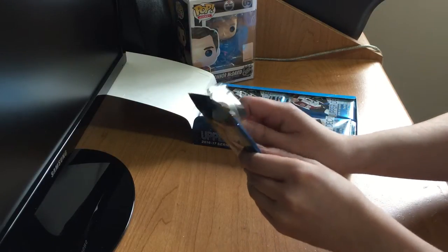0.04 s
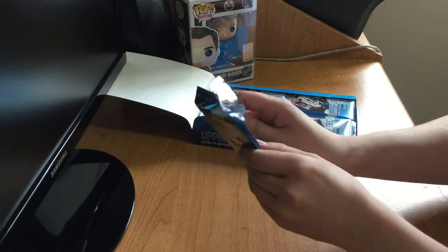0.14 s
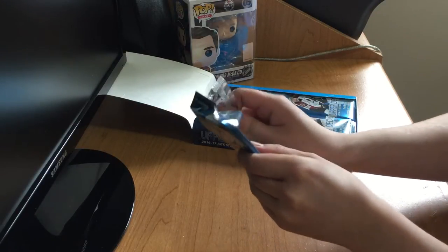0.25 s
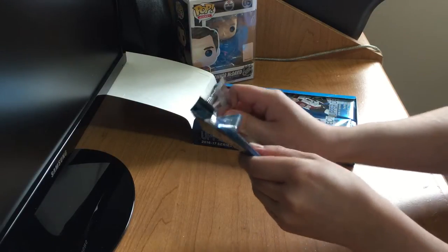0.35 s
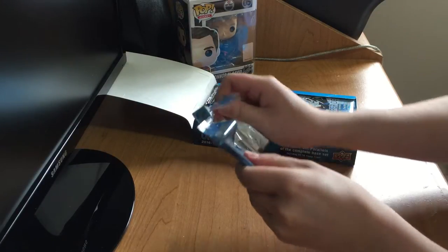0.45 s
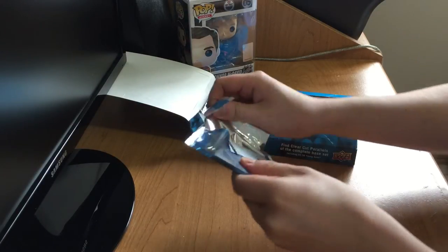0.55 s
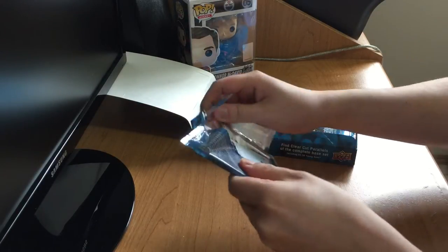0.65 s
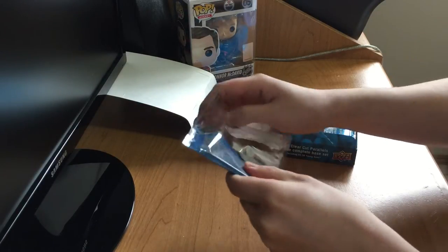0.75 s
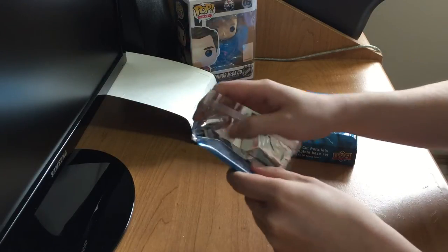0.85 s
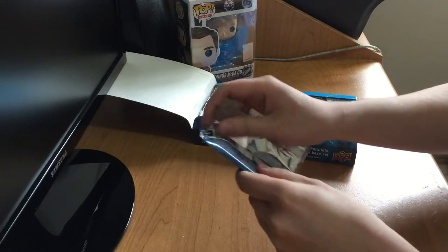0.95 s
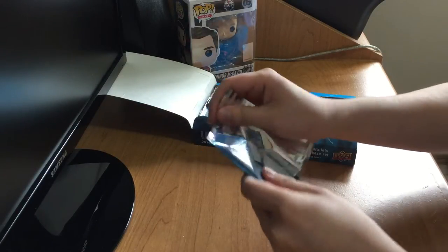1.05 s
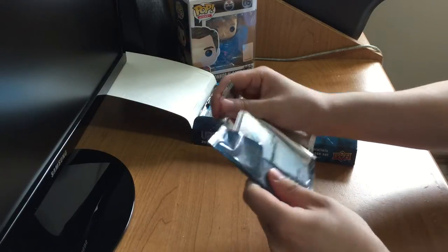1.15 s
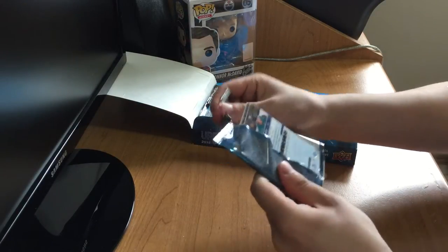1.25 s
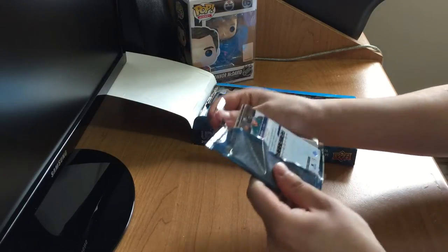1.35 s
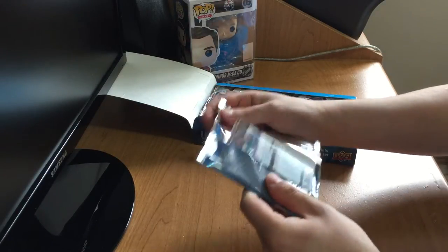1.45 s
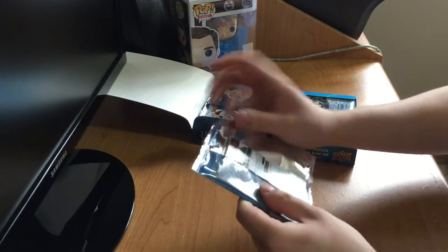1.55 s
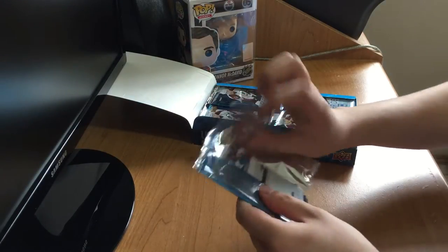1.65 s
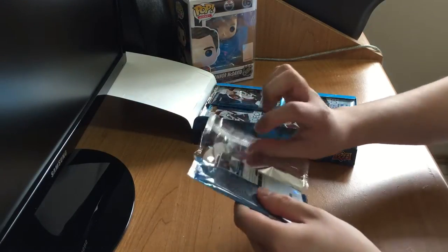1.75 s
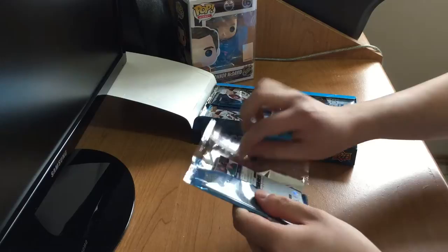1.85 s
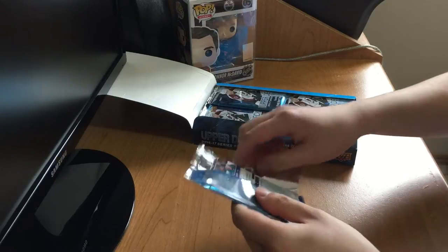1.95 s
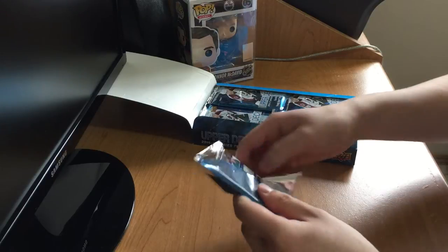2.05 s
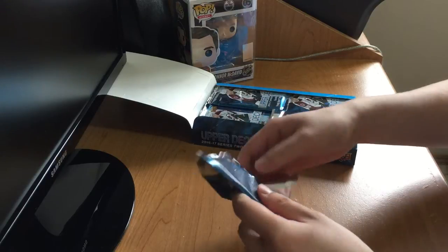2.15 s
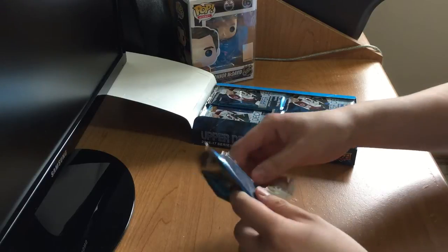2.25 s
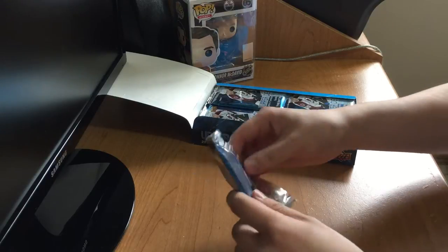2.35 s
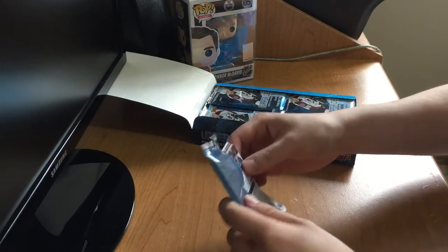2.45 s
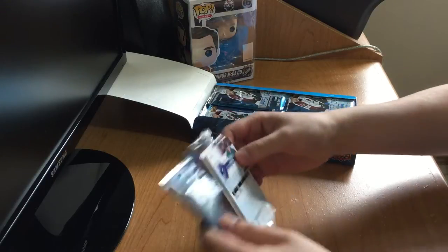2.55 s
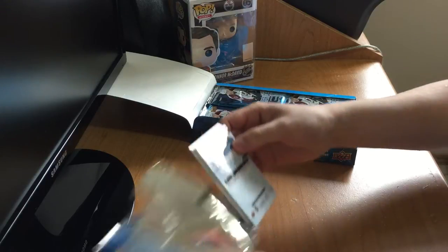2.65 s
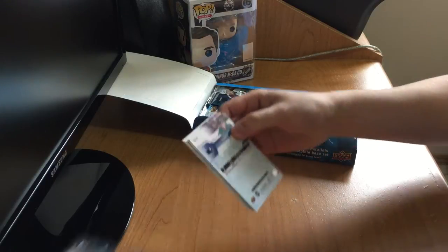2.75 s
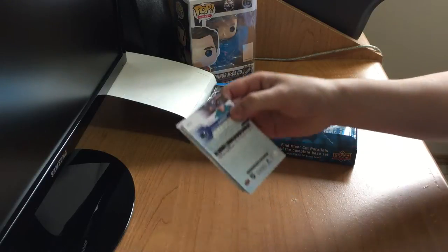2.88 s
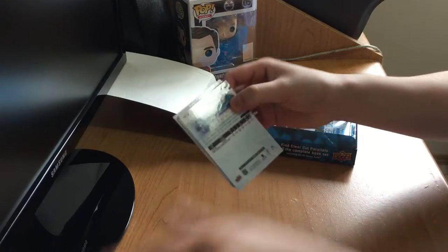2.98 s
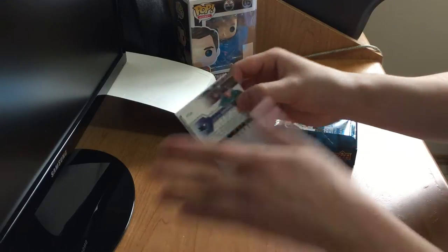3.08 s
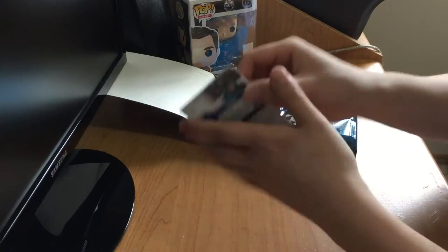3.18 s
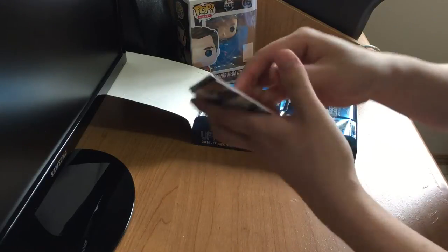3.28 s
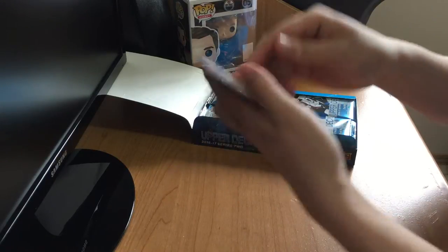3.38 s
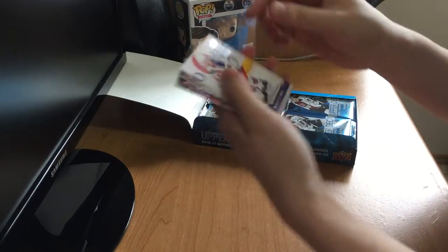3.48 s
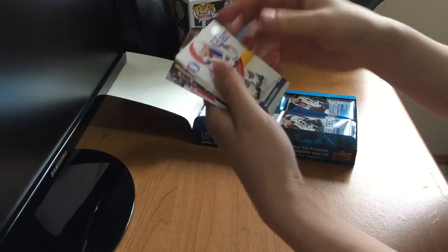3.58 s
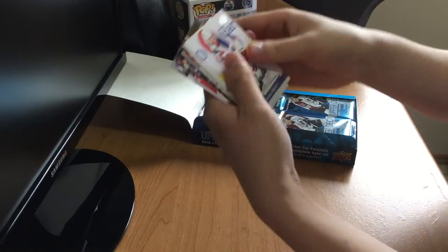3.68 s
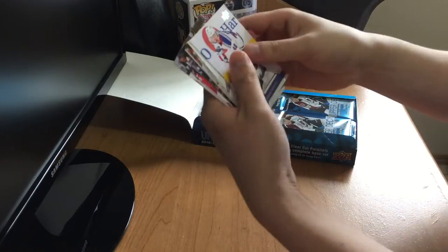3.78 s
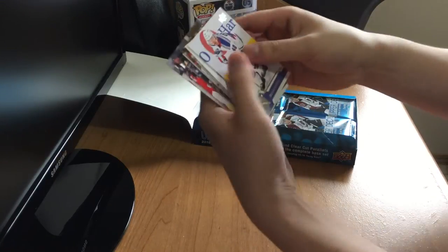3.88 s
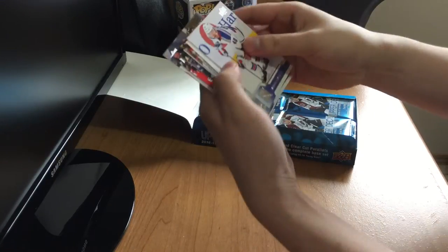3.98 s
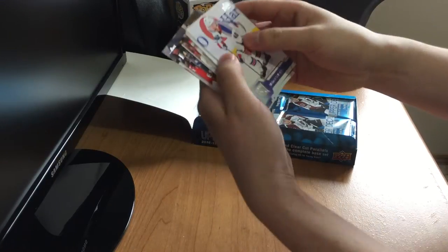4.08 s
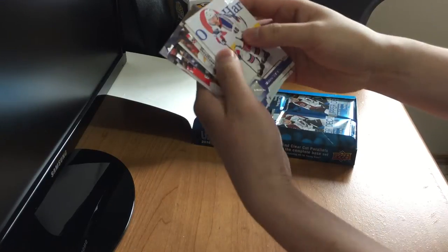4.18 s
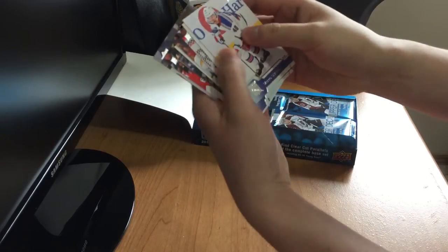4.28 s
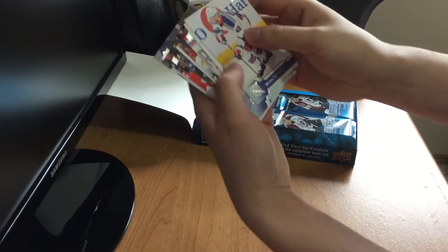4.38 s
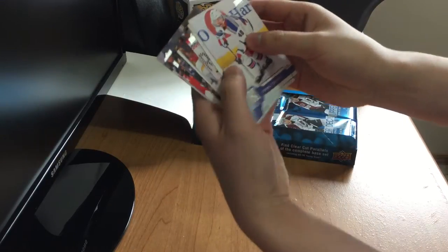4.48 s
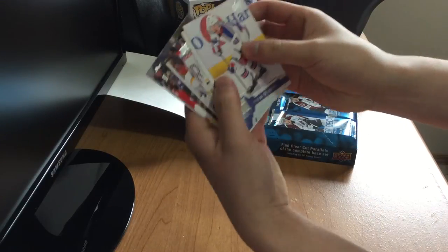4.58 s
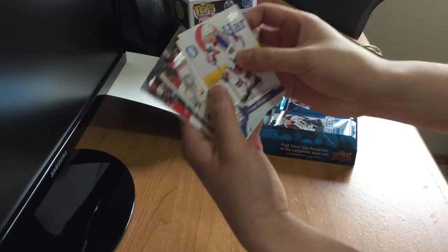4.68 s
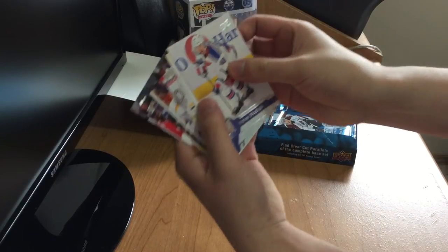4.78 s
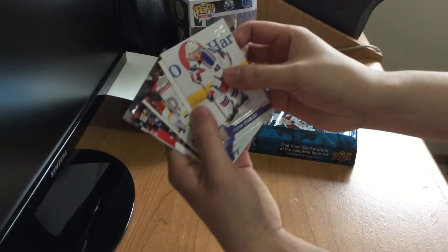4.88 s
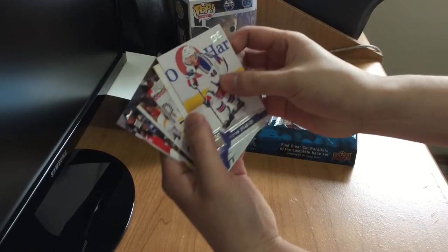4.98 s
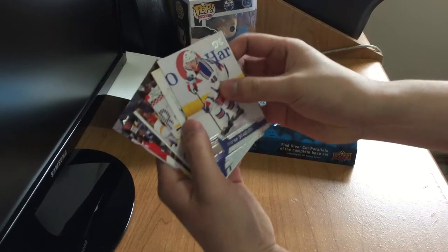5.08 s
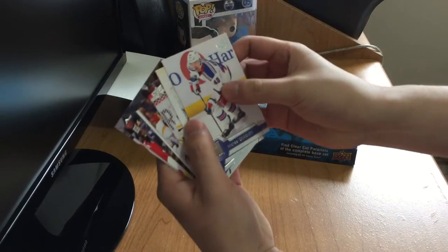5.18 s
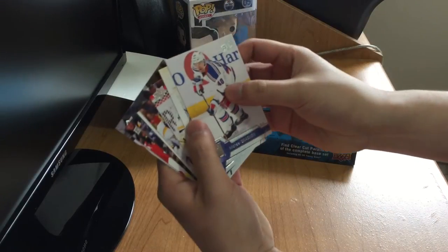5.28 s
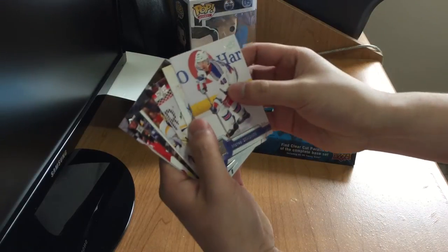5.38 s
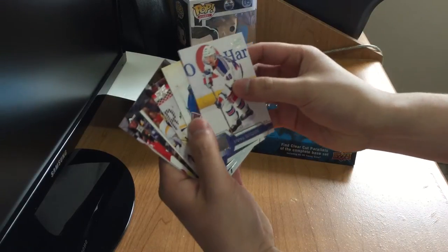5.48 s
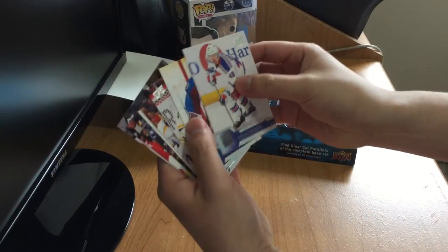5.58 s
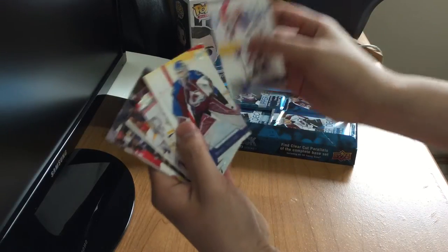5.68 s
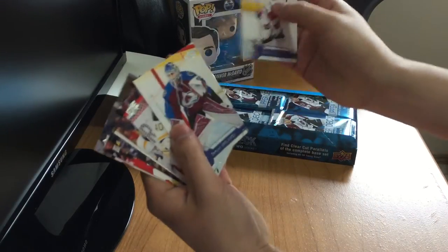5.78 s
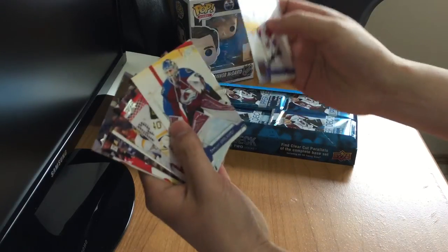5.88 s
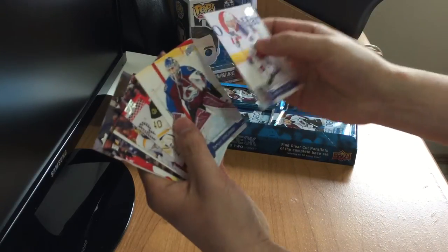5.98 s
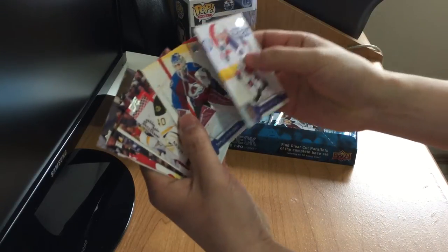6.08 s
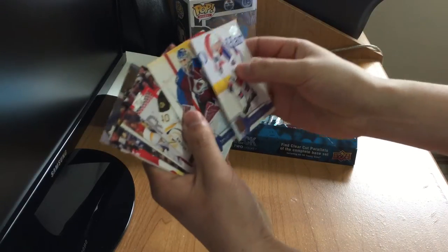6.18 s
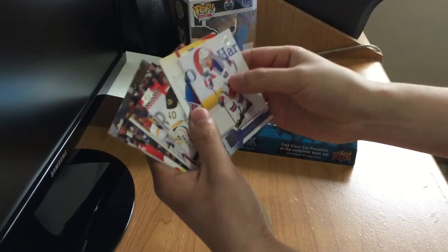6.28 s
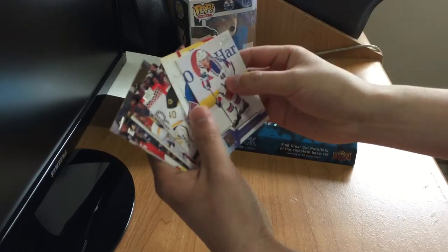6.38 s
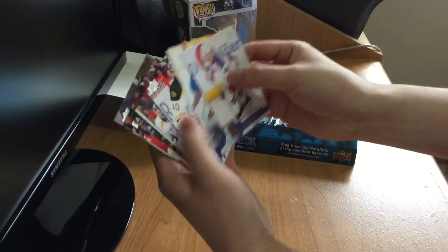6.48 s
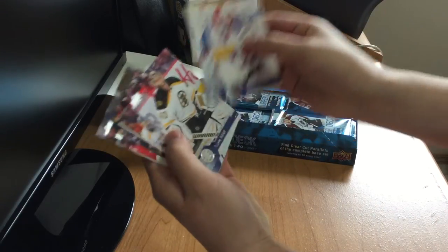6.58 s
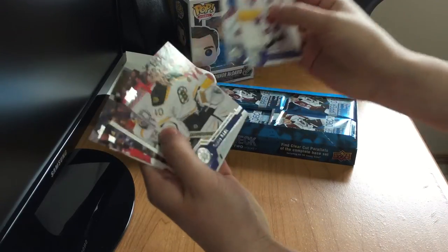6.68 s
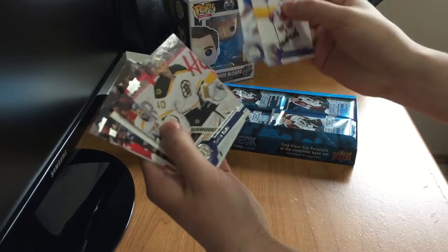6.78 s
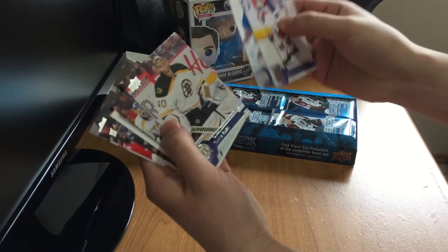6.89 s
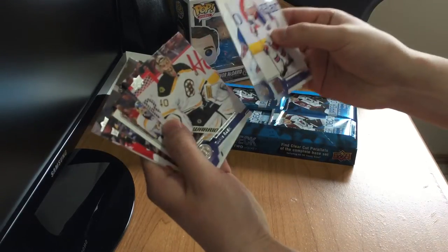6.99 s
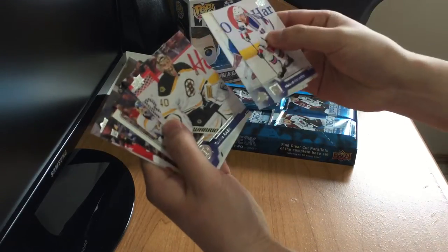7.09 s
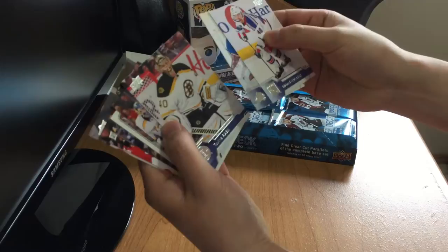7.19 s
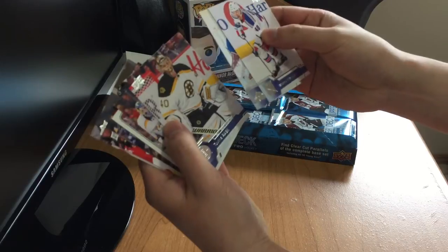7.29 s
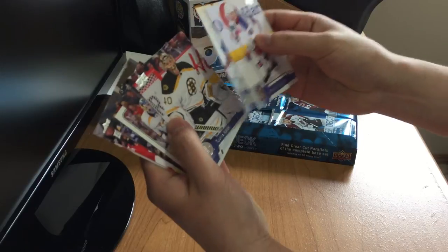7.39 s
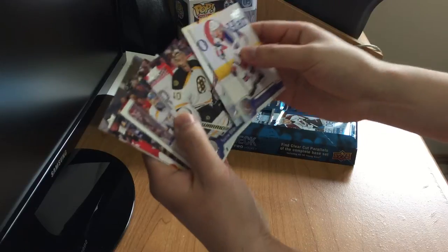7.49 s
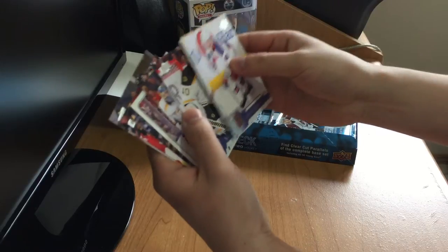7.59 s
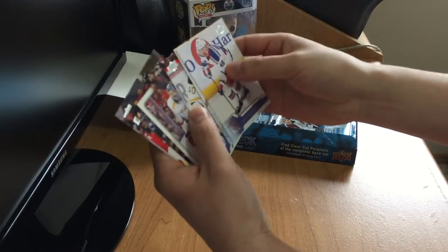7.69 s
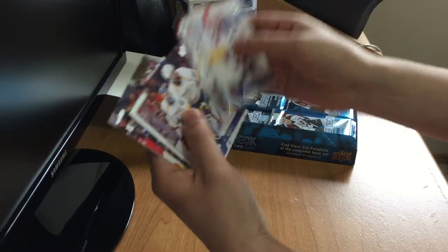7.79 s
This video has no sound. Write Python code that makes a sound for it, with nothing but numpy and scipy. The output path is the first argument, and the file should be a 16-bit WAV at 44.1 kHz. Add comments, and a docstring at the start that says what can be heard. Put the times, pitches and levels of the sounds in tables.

```python
"""Foil card pack torn open by hand at a desk: sharp snaps of buckling creases, each a short burst with a ringing
facet, over a crackle of random ticks; the ripping seam is a dense run of ticks, squeaks are gliding tones.
Then cards are drawn out and leafed through: edges tap as ringing bursts, faces slide as gritty noise,
a thumb drags as stick-slip grains, and hands bump as short low swells.
One microphone close by in a small, quiet room: the room answers with decaying noise, over steady air and faint hum."""
import sys
import numpy as np
from scipy import signal
from scipy.fft import rfft, irfft, next_fast_len
from scipy.io import wavfile
from scipy.ndimage import uniform_filter1d, map_coordinates

SR = 44100
rng = np.random.default_rng(int(sys.argv[2]) if len(sys.argv) > 2 else 0)


def put_to_file(sound):
    """Save the sound as 16-bit audio at rate SR, in the file named by the first command-line argument."""
    columns = np.atleast_2d(sound).T  # one column per channel
    safe = np.clip(columns, -1, 1)
    whole_steps = np.round(safe * 32767)
    wavfile.write(sys.argv[1], SR, whole_steps.astype(np.int16))


N = 345733
TIME = np.arange(N) / SR
TOP_HZ = 16000  # upper band limit

# Individually timed snaps of creases buckling in the foil, loud and faint.
# Each row: start in seconds, level in dB, bass in dB, treble in dB, facet ring in Hz.
CREASE_SNAPS = [(0.0396, -34.5, -4, -14, 10180), (0.0617, -31.5, -4, -14.5, 6250),
                (0.0724, -31.5, -14, -4.5, 7060), (0.1006, -28.5, -12.5, -3.5, 4330),
                (0.138, -25.5, -7, 4, 5530), (0.1417, -26, -14.5, -9.0, 7060), (0.154, -32, -4, -5, 2080),
                (0.2197, -29.5, -4, -1, 2350), (0.2699, -22.5, -22, 1, 4330),
                (0.2728, -14.5, -18.0, -4, 7060), (0.2741, -18.5, -8.5, 0.5, 4890),
                (0.2816, -32.0, -18.5, -4, 4890), (0.3167, -15.5, -15, -0.0, 7060),
                (0.4015, -20, -11.0, 0, 1630), (0.4382, -16.0, -1, 6, 9010), (0.4975, -25, -7, 7.5, 1000),
                (0.5185, -20, -4.5, 0, 1280), (0.5372, -11.5, -13.0, -3.5, 1440),
                (0.5478, -23, 4.5, -2.5, 2080), (0.5541, -17, 3.5, -8, 1630),
                (0.567, -17.5, 10, -6.5, 1440), (0.5814, -16, 0.5, -2.0, 2080), (0.5878, -8, 2, -2, 2350),
                (0.5963, -30, -1.0, -8.5, 1630), (0.6273, -28.5, 3.0, 0.5, 5530),
                (0.6956, -32.5, -4.5, -3.5, 7980), (0.721, -32.5, -2.5, 2.5, 1440),
                (0.7274, -21, 5, -5, 1440), (0.7361, -37.0, -2.5, -13, 1840),
                (0.7516, -33.5, -7.5, -13, 3000), (0.8084, -19.5, -4.5, 0.5, 1000),
                (0.8305, -22, 1, 2.0, 7060), (0.8309, -18.0, -11, -3.5, 1840),
                (0.8408, -34.0, -2.5, -8, 1840), (0.8487, -29.5, -2.5, -14, 13000),
                (0.8937, -19, 0.5, 6, 7060), (0.9038, -25.0, -9, -2, 5530),
                (1.031, -23.5, -11.5, -5.5, 3000), (1.0336, -25.0, -12, -2, 3000),
                (1.0818, -31.5, -19, -1, 6250), (1.1236, -28.5, 5.5, -6.5, 3000),
                (1.145, -35.5, 1.5, -13.5, 3000), (1.1553, -31.5, -4, -17, 3000),
                (1.1693, -24, -13.5, -2, 3000), (1.1963, -39, -3, -11.5, 3000),
                (1.2235, -22.5, 4.0, -14.5, 13000), (1.2265, -19.5, 1.5, -6.5, 7060),
                (1.2301, -23.5, -3.5, -12.0, 9010), (1.243, -23, -9, 1, 4890),
                (1.2617, -14.5, -3, -5, 7980), (1.2747, -29.5, -2, -7.5, 5530),
                (1.2822, -29.0, 7.5, 0.5, 3830), (1.3257, -35, -4.0, -6.5, 1130),
                (1.3586, -21.5, 0, -6.5, 3000), (1.3766, -31.5, 9.5, -1.0, 2080),
                (1.3983, -20, -1, 2.5, 1630), (1.4204, -18, 4.5, -6.0, 2660), (1.5299, -21, 2, -0.5, 5530),
                (1.5425, -24, -7, -15.5, 2660), (1.5538, -36.5, -1.5, -6.5, 7980),
                (1.5716, -22, 1, 6.5, 3000), (1.6192, -26.5, -8, 3, 6250),
                (1.6301, -28.5, -3.5, -3.5, 3000), (1.6621, -30.5, -11, 1.0, 7980),
                (1.6757, -27.5, -3, 3, 7060), (1.6856, -36, 3, -4, 4890), (1.7458, -36, 3, -0.5, 4890),
                (1.755, -27, -8, -5.0, 1000), (1.7725, -37, -4, -25, 7060), (1.7948, -35.5, 6.5, -4, 6250),
                (1.8525, -44.5, 7, 9.5, 5530), (1.9996, -44.5, -3.0, 7, 13000),
                (2.1137, -41, -16, -6, 1000), (2.1284, -27.0, -5.5, 1.5, 1840),
                (2.1364, -35.5, 3.5, -8, 4890), (2.1404, -23, -37, 1.5, 1280),
                (2.1533, -27.0, -14, -3.5, 4890), (2.2793, -46.0, -4.0, 8, 3830),
                (2.292, -29.5, -8, -8.0, 4330), (2.3209, -22.5, -35, -3.5, 2660),
                (2.3927, -32.5, -14, -11, 3390), (2.4329, -33.5, -2.5, -12, 10180),
                (2.64, -32.0, -25, -6.5, 4890), (2.6485, -35.5, -8, -13.5, 3390),
                (2.73, -43, 6.0, -18, 3000), (2.7392, -49, 4, -12, 1000), (2.765, -49, -5, -9.0, 5530),
                (2.8518, -43.5, -13, 3.5, 5530), (2.8577, -46, -6, 7.5, 6250), (2.9332, -36, 1, -6.5, 4890),
                (2.9372, -35.5, -8, -7.0, 1280), (2.9632, -33, -5.5, -3, 1440),
                (2.9745, -45.5, -13, -12, 2350)]
# Squeezes and pulls of the wrapper; the grip is at full strength from the start.
# Each row: start in seconds, length in seconds, crackle in dB before its trim, panel rustle in dB.
WRAPPER_GRIPS = [(0.02, .055, -44, -53.5), (0.151, .19, -43, -60.5), (0.4, .17, -40.5, -53.5),
                 (0.569, .04, -43, -35), (0.638, .15, -50.5, -49), (0.815, .1, -48.5, -52.5),
                 (1.038, 0.049, -49.5, -70), (1.057, 0.00499, -56, -54.5), (1.141, .08, -44, -57),
                 (1.247, .185, -44, -53), (1.532, .11, -46.5, -63), (1.729, 0.036, -44, -63),
                 (1.84, 0.044, -61.5, -78), (2.01, .09, -71, -72.5), (2.14, 0.041, -48, -56),
                 (2.298, .05, -63, -66), (2.389, .06, -47.5, -57.5), (2.533, .1, -63.5, -78.5),
                 (2.648, .03, -48, -57.5), (2.742, .04, -55.5, -80), (2.946, .05, -53.5, -81),
                 (3.055, .055, -57.5, -60)]
# Foil tearing or scraping.
# Each row: start in seconds, length in seconds, level in dB before its trim, bass in dB, treble in dB.
SEAM_RIPS = [(0.18, 0.049, -33.5, -6.5, -3.5), (0.239, 0.026, -35, -11.5, -6.5),
             (0.381, 0.046, -32.5, -14, -1.5), (0.406, 0.028, -26, -4.5, -2), (0.456, 0.097, -38, -16, 5),
             (0.514, 0.027, -26, -1.5, -3.5), (.54, 0.04, -27.5, 6, -6), (0.883, 0.0053, -28, 5.5, -1.5),
             (1.264, 0.018, -30.5, 0.5, -4.5), (1.394, 0.036, -33, -10, -3.5),
             (2.126, 0.029, -39.5, -6.5, -4), (2.655, 0.026, -51.5, 6, -6), (2.921, 0.025, -46, -4, -5)]
# Stick-slip squeaks of foil, seam and thumb.
# Each row: start in seconds, length in seconds, from Hz, to Hz, pitch roughness as a share of the pitch,
# level of the fundamental in dB, step to each further overtone in dB.
STICK_SLIP_SQUEAKS = [(0.2375, 0.011, 3220, 2650, 0.071, -34, -2.5),
                      (0.468, 0.054, 14800, 11600, 0.057, -39, -62),
                      (4.822, 0.029, 1836, 1790, 0.025, -61.5, -22)]
# Rings of wrinkles from coarse to fine. Each entry: frequency in Hz.
WRINKLE_RINGS_HZ = [2200, 3280, 5600, 8550, 12500]
# Colour of the pouch's broad panels. Each row: frequency in Hz, gain in dB.
POUCH_COLOUR = [(100, -36.5), (400, -20), (650, -7.5), (900, -8.5), (1350, 1), (2150, -3.5), (2900, -15.5),
                (4500, -20.5), (8000, -29)]
# Card edges striking or grazing the stack.
# Each row: start in seconds, level in dB, bass in dB, treble setting in dB, card ring in Hz,
# contact in seconds, stack knock in dB relative to the level.
EDGE_TAPS = [(3.0481, -26.5, 2.5, -9.5, 2220, 0.001, -21), (3.101, -45.5, -5, -28, 1110, 0.0011, -19),
             (3.3776, -43, -15, -1, 8050, 0.00135, -16), (3.3828, -42, -32.5, -8, 3340, 0.00077, -31),
             (4.6069, -56, 6, -4, 4410, 0.0021, -17), (5.8151, -30.5, 3, -6.5, 3680, 0.00085, -2),
             (5.819, -35, -9, -9, 4400, 0.00068, -16), (6.0635, -46, 0, -15.5, 2800, 0.0038, -19),
             (6.2633, -46.5, 0, -16, 2100, 0.00092, -13), (6.281, -28, 0, -18.5, 6740, 0.00052, -22),
             (6.388, -41, 0, -2.5, 3300, 0.005, -36), (6.7133, -40.5, 1, -13.5, 6030, 0.0012, -12),
             (6.7417, -45, 8, -23, 780, 0.001, -11), (7.139, -47, 4.5, -9, 3600, 0.003, -25),
             (7.4879, -47, -18, 13.5, 14300, 0.0006, -39), (7.493, -47.5, -15, 2, 6500, 0.0022, -36),
             (7.5874, -41.5, -3.5, -17.5, 1400, 0.00062, -29), (7.59, -37.5, -1, -13.5, 2500, 0.0013, -14),
             (7.7142, -46.5, -29, -7, 5080, 0.0005, -27), (7.8227, -56, 6, -23, 1490, 0.0007, -16)]
# The held stack of cards. Each row: frequency in Hz, level in dB, t60 in seconds.
STACK_MODES = [(394, -9.5, 0.037), (558, -6, 0.012), (698, 5.5, 0.013), (1508, 3.5, 0.026),
               (3130, 3.5, 0.01), (4210, 7, 0.016)]
# Strokes of card over card.
# Each row: start in seconds, length in seconds, level in dB before its trim, treble in dB,
# edge ring from Hz, to Hz.
CARD_STROKES = [(3.288, 0.123, -72, 6.5, 3300, 3480), (3.426, 0.184, -65.5, -2, 2300, 2010),
                (5.725, 0.11, -54, 0, 3000, 3440), (6.269, 0.06, -56.5, 5, 5700, 5280),
                (6.316, 0.078, -55.5, 4, 5300, 4400), (6.632, 0.093, -65, 6, 3000, 5010),
                (7.582, 0.092, -57, 1.5, 4800, 5600), (7.681, 0.058, -55.5, 6, 5000, 5300)]
# Colour of a sliding card. Each row: frequency in Hz, gain in dB.
RASP_COLOUR = [(100, -36), (400, -55), (1100, -6), (1650, -8.5), (2900, -2), (3850, -9), (5100, -5),
               (6600, -6.5), (9200, -4), (10400, -10), (13000, -9), (16000, -13)]
# A thumb dragging the cards into a fan. Each row: start in seconds, length in seconds, level in dB.
THUMB_DRAGS = [(4.599, 0.2, -74), (4.717, 0.014, -66), (4.775, 0.099, -67)]
# The card under the thumb. Each row: frequency in Hz, width in Hz before the skin's damping, level in dB.
THUMBED_CARD = [(530, 23, 5), (910, 300, -5), (1450, 54, 5.5), (1770, 43, -11), (3200, 900, -10.5)]
# Soft bumps of hands and arms.
# Each row: start in seconds, peak of the swell in dB before the rumble filter, frequency in Hz.
HAND_BUMPS = [(0.204, -45, 359), (0.572, -33.5, 280), (1.222, -33, 300), (1.262, -39, 229.2),
              (1.362, -38.5, 230), (2.405, -50, 69.4), (2.438, -46.5, 170), (2.955, -46.5, 141),
              (3.049, -45, 158), (3.247, -47, 153), (3.381, -48, 168), (3.962, -39.5, 62.4),
              (4.016, -48, 54.5), (4.61, -55, 64), (5.818, -38, 163), (6.365, -53, 129),
              (6.716, -47.5, 202), (6.743, -47.5, 282)]
# Colour of the desk reflection. Each row: frequency in Hz, gain in dB.
DESK_COLOUR = [(30, -12), (200, -2), (410, 2), (475, -6), (540, 2), (720, 0.5), (930, 4), (1500, -6),
               (1950, 2), (4000, 2), (8500, -1), (10400, -4), (12000, -0.5), (16000, -1.5)]
# Narrow resonances of the desk nook. Each row: frequency in Hz, gain in dB.
NOOK_RESONANCES = [(630, 4.5), (781, -0.5), (946, 2), (1214, 6.5), (1475, 6), (1948, 7), (2141, 5),
                   (2424, -1.5)]
# Colour of the room's answer. Each row: frequency in Hz, gain in dB.
WALL_COLOUR = [(100, -8.5), (400, 6), (900, 3.5), (2000, 0.5), (6000, -1.5), (10000, -3), (16000, 4)]
# How long the room rings. Each row: frequency in Hz, t60 in seconds.
ROOM_T60 = [(200, 0.66), (600, 0.25), (1100, 0.21), (2000, 0.15), (3700, 0.33), (9700, 0.27),
            (16000, 0.088)]
# Colour of the quiet room's noise. Each row: frequency in Hz, gain in dB.
AIR_COLOUR = [(15, -71.5), (25, -35.5), (53, -10), (92, -11), (127, -4.5), (200, -14), (229, -3),
              (293, -14.5), (695, -16), (775, -17), (1160, -19), (1260, -21.5), (1480, -19.5), (13600, -36),
              (16000, -38.5)]
# The faint hum. Each row: frequency in Hz, level in dB.
HUM_TONES = [(231.5, -80.5), (689, -89)]

FACET_HZ, FACET_SPREAD_OCT = 4780, 1  # ring of a typical facet, and the scatter among facets
# treble of a typical lesser snap; smaller facets ring higher and sound brighter
SNAP_TREBLE_DB, TREBLE_DB_PER_OCT = -4.5, 0.5
SMALL_SNAP_DB, SMALL_SCATTER_DB = 7, 2.5  # lesser creases, over the untrimmed grip crackle
# the foil yields quickly and settles once the fingers rest
GRIP_ATTACK_S, CRACKLE_T60_S, PANEL_T60_S = 0.037, 0.086, 0.24
CRACKLE_TRIM_DB, RIP_TRIM_DB, STROKE_TRIM_DB = -3.5, -4.0, -3.5
# a card gathers speed over part of its stroke, then stops short
STROKE_RISE_SHARE, STROKE_T60_S = 0.56, 0.056
EDGE_HALF_WIDTH_HZ, EDGE_SHARE = 420, 0.53  # the rubbing edge sings in a narrow band
SKIN_DAMPING_HZ = 150  # the pressing thumb broadens the card's resonances
AIR_DB = -69.0  # rms


def snaps(creases, panel_db, panel_t60):
    """Creases flip over one by one, and each sets a loose panel of the pouch ringing."""
    out = np.zeros(N)
    for s, db, bass_db, treble_db, hz in creases:
        snap = click(foil_shape(bass_db, treble_db), hz, ring_db=9.5, ring_width=0.2, rise=.0006, fall=.00055,
                     flutter_db=-24, flutter_fall=.003, spiky_db=3.5, count=3)
        add(out, s, amp(db) * snap)
        # bassier snaps move the panel more, up to a limit
        panel = [(f, panel_db + min(bass_db, 3), panel_t60) for f in rng.uniform(700, 2400, size=2)]
        add(out, s, amp(db) * ring(panel, scatter_db=0.0))
    return out


def small_snaps(crackle, count, bass_db, bass_scatter_db):
    """More creases give way at chance moments in the grips, as hard as the foil is worked; rows as CREASE_SNAPS."""
    in_grip = [(TIME > s) & (TIME < s + length) for s, length, _, _ in WRAPPER_GRIPS]
    held = np.flatnonzero(np.any(in_grip, axis=0))
    shares = (np.arange(count) + rng.random(count)) / count  # one chance moment in each equal share
    moments = held[(shares * len(held)).astype(int)]
    scatter = np.clip(rng.standard_normal((count, 3)), -2, 2)
    rows = []
    for i, (size, depth, pitch) in zip(moments, scatter):
        octaves = FACET_SPREAD_OCT * pitch
        level_db = 20 * np.log10(crackle[i]) + SMALL_SNAP_DB + SMALL_SCATTER_DB * size
        treble_db = SNAP_TREBLE_DB + TREBLE_DB_PER_OCT * octaves
        rows.append((i / SR, level_db, bass_db + bass_scatter_db * depth, treble_db, FACET_HZ * 2 ** octaves))
    return rows


def onset_crackle(db):
    """A short, faint crackle swells for 4 ms into each listed snap, softening its onset."""
    lead_s = .004
    out, n = np.zeros(N), int(lead_s * SR)
    for s, snap_db, *_ in CREASE_SNAPS:
        add(out, s - lead_s, amp(snap_db + db) * np.linspace(0, 1, n) ** 2)
    crackle = grains(N, rate=3100, spread_db=3.5, life=0.0012)
    shape = foil_shape(bass_db=-4.0, treble_db=-8.5)
    return out * unit(colour(crackle, lambda hz: along(shape, hz)))


def rips():
    """The seam gives way in dense runs of tiny fractures, which ring the facets beside it."""
    out = np.zeros(N)
    for s, length, db, bass_db, treble_db in SEAM_RIPS:
        n, run = int(length * SR), 0
        shape = foil_shape(bass_db, treble_db)
        for ring_hz in WRINKLE_RINGS_HZ * np.exp(.15 * rng.standard_normal(len(WRINKLE_RINGS_HZ))):
            fractures = grains(n, rate=650, spread_db=2.5, life=.0004) * signal.windows.tukey(n, .35)
            fractures = np.pad(fractures, (0, n))  # room for the facets to ring out
            facet = lambda hz: 9 / (1 + (6 * (hz / ring_hz - 1)) ** 2)
            run = run + colour(fractures, lambda hz: along(shape, hz) + facet(hz))
        add(out, s, amp(db + RIP_TRIM_DB) * unit(run))
    return out


def grip():
    """Gains of the wrinkles' crackle and of the panels' rustle as the hands work the wrapper."""
    crackle = [amp(db) * gesture(s, length, GRIP_ATTACK_S, CRACKLE_T60_S) for s, length, db, _ in WRAPPER_GRIPS]
    rustle = [amp(db) * gesture(s, length, GRIP_ATTACK_S, PANEL_T60_S) for s, length, _, db in WRAPPER_GRIPS]
    return np.max(crackle, axis=0), np.max(rustle, axis=0)


def crumple(crackle, rustle):
    """Wrinkles of different sizes crackle in clumps, and the broad panels rustle lower as they flex."""
    fine = sum(wrinkles(hz, ring_db=12, width_oct=.25) for hz in WRINKLE_RINGS_HZ)
    fine = unit(fine * amp(1.9 * wobble(37)))
    flex = grains(N, rate=350, spread_db=3.0, life=0.0023)
    flex = unit(colour(flex, lambda hz: along(POUCH_COLOUR, hz)))
    return amp(CRACKLE_TRIM_DB) * crackle * fine + rustle * flex


def wrinkles(ring_hz, ring_db, width_oct):
    """The ticks of wrinkles of one size, coloured by their broad ring."""
    ticks = grains(N, rate=110, spread_db=4, life=.0005)
    shape = foil_shape(bass_db=-11.0, treble_db=-6.0)
    bell = lambda hz: ring_db / (1 + (np.log2((hz + 1) / ring_hz) / width_oct) ** 2)
    return colour(ticks, lambda hz: along(shape, hz) + bell(hz))


def foil_shape(bass_db, treble_db):
    """Thin foil radiates little bass, more when a large panel moves; (Hz, dB) points."""
    return [(60, bass_db - 34), (200, bass_db - 14.5), (450, bass_db - 2.5), (850, bass_db + 3.0),
            (2200, -1.4), (5500, -1.7), (9000, treble_db + 4.5), (15500, treble_db - 1.0)]


def squeaks():
    """A surface sticks and slips so fast that it chirps, with an unsteady, gliding pitch."""
    out = np.zeros(N)
    for start, length, from_hz, to_hz, rough, db, overtone_db in STICK_SLIP_SQUEAKS:
        n = int(length * SR)
        unsteady = unit(uniform_filter1d(rng.standard_normal(n), size=30))
        pitch = np.linspace(from_hz, to_hz, n) * (1 + rough * unsteady)
        phase = 2 * np.pi * np.cumsum(pitch) / SR
        chirp = sum(amp(db + k * overtone_db) * np.sin((k + 1) * phase) for k in range(3))
        add(out, start, signal.windows.tukey(n, .3) * chirp)
    return out


def taps(rebound_db, rebound_delay):
    """Stiff card edges flick off a thumb, land on or graze the stack, which rings briefly, and touch once more."""
    out = np.zeros(N)
    for s, db, bass_db, treble_db, hz, contact_s, knock_db in EDGE_TAPS:
        shape = [(60, bass_db - 28), (190, bass_db + 0.5), (350, bass_db + 2.0), (700, bass_db + 0.5),
                 (1000, bass_db + 1.0), (1550, 3.8), (2400, 1.4), (3600, 0.33 * treble_db - 0.5),
                 (5500, 0.15 * treble_db - 0.5), (9000, treble_db + 6.0), (15500, treble_db + 0.5)]
        rebound = (rebound_delay * rng.uniform(0.56, 0.85), db + rebound_db)
        for delay, contact_db in [(0, db), rebound]:
            edge = click(shape, hz, ring_db=9, ring_width=0.09, rise=0.75 * contact_s, fall=contact_s,
                         flutter_db=-17, flutter_fall=0.005, spiky_db=4.5, count=2)
            add(out, s + delay, amp(contact_db) * edge)
        add(out, s, amp(db + knock_db) * ring(STACK_MODES, scatter_db=0.5))
    return out


def slides(grit_db):
    """Card faces rub with a gritty hiss; the edge's resonance glides as the overlap changes."""
    rub = grains(N, rate=3200, spread_db=-2.5, life=0.00041)
    rub = unit(colour(rub, lambda hz: along(RASP_COLOUR, hz)))
    dull = signal.sosfiltfilt(signal.butter(2, 4500, fs=SR, output="sos"), rub)
    # a pair of slow noises makes the narrow band around the gliding edge pitch
    narrow = signal.butter(2, EDGE_HALF_WIDTH_HZ, fs=SR, output="sos")
    sing = unit(signal.sosfilt(narrow, rng.standard_normal((2, N))))
    out = np.zeros(N)
    for s, length, db, treble_db, from_hz, to_hz in CARD_STROKES:
        pitch = np.interp(TIME, [s, s + length], [from_hz, to_hz])
        phase = 2 * np.pi * np.cumsum(pitch) / SR
        edge = sing[0] * np.cos(phase) + sing[1] * np.sin(phase)
        face = dull + amp(treble_db) * (rub - dull)
        out += amp(db + STROKE_TRIM_DB) * stroke(s, length) * (face + EDGE_SHARE * edge)
    return amp(grit_db * wobble(160)) * out


def drags():
    """Skin sticks and slips on a card, exciting its low resonances."""
    def body(hz):
        """Summed power of the card's damped resonances, in dB."""
        return 10 * np.log10(sum(amp(db) ** 2 / (1 + (2 * (hz - centre) / (width + SKIN_DAMPING_HZ)) ** 2)
                                 for centre, width, db in THUMBED_CARD))
    slips = unit(colour(grains(N, rate=1500, spread_db=1.5, life=.003), body))
    return slips * sum(amp(db) * stroke(s, length) for s, length, db in THUMB_DRAGS)


def bumps(swell_cycles):
    """Soft blows swell and die within a few low cycles."""
    out, t = np.zeros(N), np.arange(SR // 4) / SR
    for s, db, hz in HAND_BUMPS:
        age = t * hz / swell_cycles
        add(out, s, amp(db) * np.sin(2 * np.pi * hz * t) * age * np.exp(1 - age))
    return signal.sosfilt(signal.butter(2, 38, "high", fs=SR, output="sos"), out)


def gesture(start, length, attack, t60):
    """Gain of one hand movement: rises until start, holds for length, dies away."""
    rise = np.clip(1 + (TIME - start) / attack, 0, 1)
    return rise * np.exp(-np.log(1000) * np.clip((TIME - start - length) / t60, 0, 2))


def stroke(start, length):
    """Gain of a card that gathers speed, glides and stops."""
    rise = length * STROKE_RISE_SHARE
    return gesture(start + rise, length - rise, rise, STROKE_T60_S)


def click(shape, ring_hz, ring_db, ring_width, rise, fall, flutter_db, flutter_fall, spiky_db, count):
    """A sheet jumps in jerks and shivers briefly; a facet rings at ring_hz. Energy of 1 ms at rms 1."""
    t = np.arange(SR // 25) / SR
    shiver = (1 - np.exp(-t / rise)) ** 2 * (np.exp(-t / fall) + amp(flutter_db) * np.exp(-t / flutter_fall))
    jerks = rng.standard_normal(len(t)) * amp(spiky_db * np.minimum(rng.standard_normal(len(t)), 2))
    # count neighbouring facets ring more weakly, at chance pitches
    neighbours = np.exp(rng.uniform(np.log(800), np.log(7000), size=count))
    centres = [ring_hz, *neighbours]

    def facets(hz):
        """Gain in dB of whichever facet rings strongest at hz."""
        peaks = [(0.4 if k else 1) / (1 + ((hz - c) / (ring_width * c)) ** 2) for k, c in enumerate(centres)]
        return ring_db * np.max(peaks, axis=0)
    sound = colour(shiver * jerks, lambda hz: along(shape, hz) + facets(hz))
    return sound / np.sqrt(np.sum(sound ** 2) * 1000 / SR)


def ring(modes, scatter_db):
    """Damped modes, slightly retuned each time, their strengths scattered by scatter_db."""
    t = np.arange(SR // 10) / SR
    struck = 0
    for hz, db, t60 in modes:
        decay = amp(db + scatter_db * rng.standard_normal() - 60 * t / t60)
        tuned_hz = hz * (1 + 0.02 * rng.standard_normal())
        struck = struck + decay * np.sin(2 * np.pi * tuned_hz * (t + rng.random()))  # chance phase
    return struck * (1 - np.exp(-t / 0.00054))


def grains(n, rate, spread_db, life):
    """Tiny noise ticks, rate a second, at random moments and of random size, dying over life seconds; rms 1."""
    sizes = (rng.random(n) < rate / SR) * amp(spread_db * np.minimum(rng.standard_normal(n), 2))
    power = signal.lfilter([1], [1, -np.exp(-2 / (life * SR))], sizes ** 2)
    return unit(np.sqrt(power) * rng.standard_normal(n))


def nook(hz, width_hz):
    """Gain in dB of the resonances between desk, screen and wall."""
    return sum(db / (1 + ((hz - centre) / width_hz) ** 2) for centre, db in NOOK_RESONANCES)


def room(x, wet_db, early_db, early_fall, delay):
    """Near surfaces answer first, then the walls; a fresh random noise tail is drawn every eighth of a second."""
    out, hop = np.zeros(N), SR // 8
    for i in range(0, N, hop):
        hz, t, z = signal.stft(rng.standard_normal(SR // 3), SR, nperseg=256)
        decay_db = along(WALL_COLOUR, hz)[:, None] - 60 * t / along(ROOM_T60, hz)[:, None]
        tail = signal.istft(z * amp(decay_db), SR, nperseg=256)[1]
        tail *= 1 + amp(early_db) * np.exp(-np.arange(len(tail)) / SR / early_fall)
        add(out, i / SR + delay, signal.fftconvolve(x[i:i + hop], tail / np.linalg.norm(tail)))
    return amp(wet_db) * out


def air():
    """Steady room noise with a faint hum, wavering in level and phase."""
    hum = sum(amp(db + 1.5 * wobble(3.9)) * np.sin(2 * np.pi * hz * TIME + 0.71 * wobble(20))
              for hz, db in HUM_TONES)
    noise = unit(colour(rng.standard_normal(N), lambda hz: along(AIR_COLOUR, hz)))
    return hum + amp(AIR_DB) * noise


def amp(db):
    """Decibels to gain."""
    return 10 ** (np.asarray(db) / 20)


def unit(x):
    """Scale to rms 1."""
    return x / np.sqrt(np.mean(x ** 2) + 1e-20)


def along(points, hz):
    """(Hz, value) points read on a log axis."""
    f, v = np.transpose(points)
    return np.interp(np.log(hz + 1), np.log(f + 1), v)


def wobble(rate):
    """A smooth random curve, rate knots a second."""
    return map_coordinates(rng.standard_normal(int(N * rate / SR) + 4), [TIME * rate])


def colour(x, gain_db):
    """Causal (minimum-phase) filter with the gain gain_db(Hz)."""
    half = next_fast_len(len(x) // 2 + 2048)
    cepstrum = irfft(np.log(amp(gain_db(np.fft.rfftfreq(2 * half, 1 / SR)))))
    cepstrum[1:half] *= 2  # fold the cepstrum onto positive time
    cepstrum[half + 1:] = 0
    return irfft(rfft(x, 2 * half) * np.exp(rfft(cepstrum)))[:len(x)]


def add(track, s, sound):
    """Mix a sound into the track at time s."""
    part = track[max(0, round(s * SR)):][:len(sound)]
    part += sound[:len(part)]


def scene():
    """Wrapper and cards above the desk; the cards face the microphone and sound drier."""
    crackle, rustle = grip()
    creases = CREASE_SNAPS + small_snaps(crackle, count=64, bass_db=-1.5, bass_scatter_db=2)
    foil = snaps(creases, panel_db=-31.5, panel_t60=0.042) + onset_crackle(db=-18)
    foil = foil + rips() + crumple(crackle, rustle) + squeaks()
    cards = taps(rebound_db=-15.0, rebound_delay=0.0017) + slides(grit_db=0.5) + drags()
    near = colour(foil + cards + bumps(swell_cycles=0.57), lambda hz: along(DESK_COLOUR, hz))
    # what reaches the room also passes the nook; the bumps stay out of it
    send = colour(foil + amp(-3.0) * cards, lambda hz: along(DESK_COLOUR, hz) + nook(hz, width_hz=23.0))
    answer = room(send, wet_db=-8.5, early_db=3.0, early_fall=0.033, delay=.006)
    return (near + answer + air())[None]


def record(dry):
    """The microphone track keeps nothing above the band limit."""
    m = next_fast_len(N + SR // 2)
    return irfft(rfft(dry, m) * (np.fft.rfftfreq(m, 1 / SR) < TOP_HZ), m)[..., :N]


dry = scene()
out = record(dry)
put_to_file(out)
```